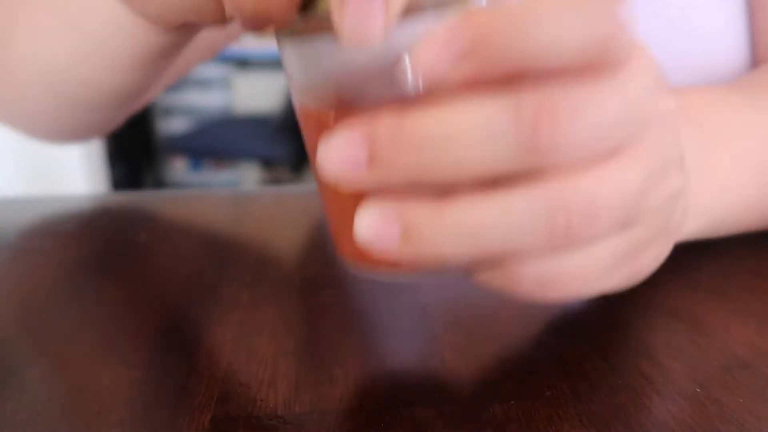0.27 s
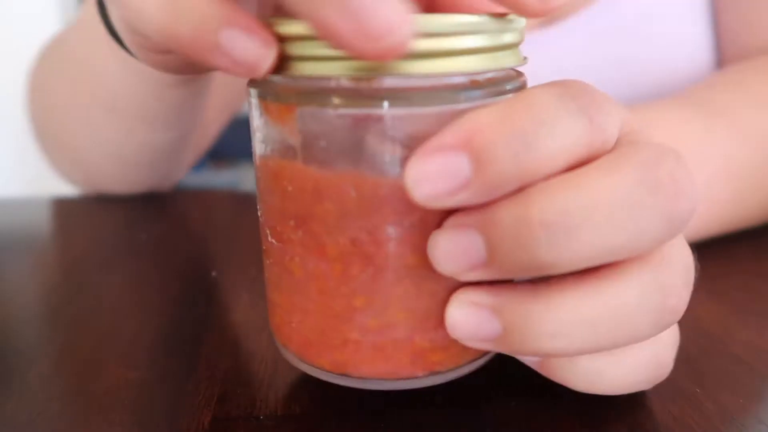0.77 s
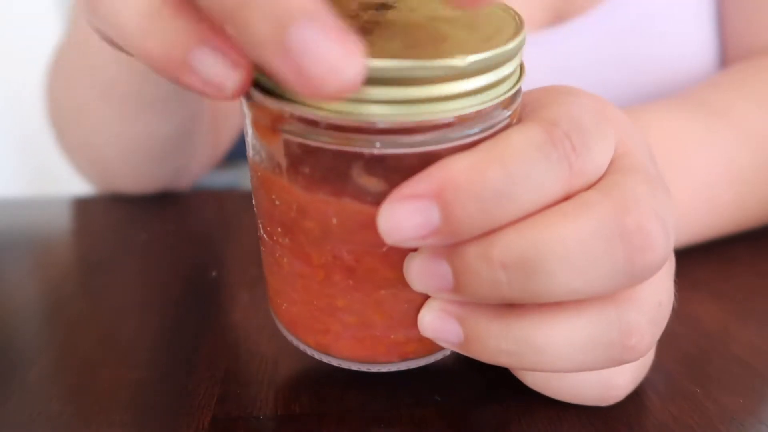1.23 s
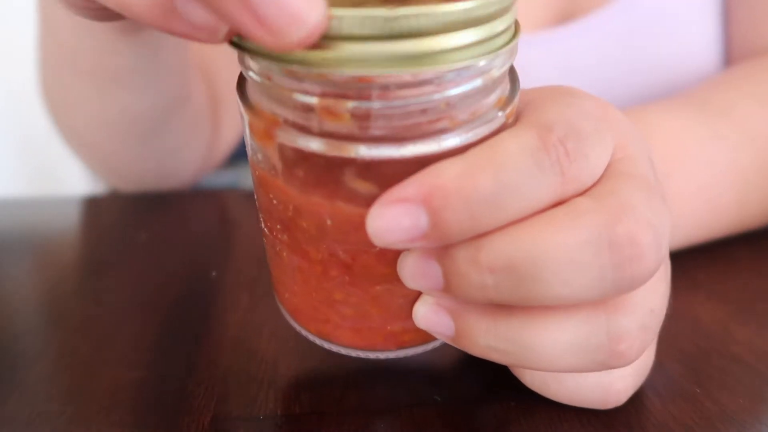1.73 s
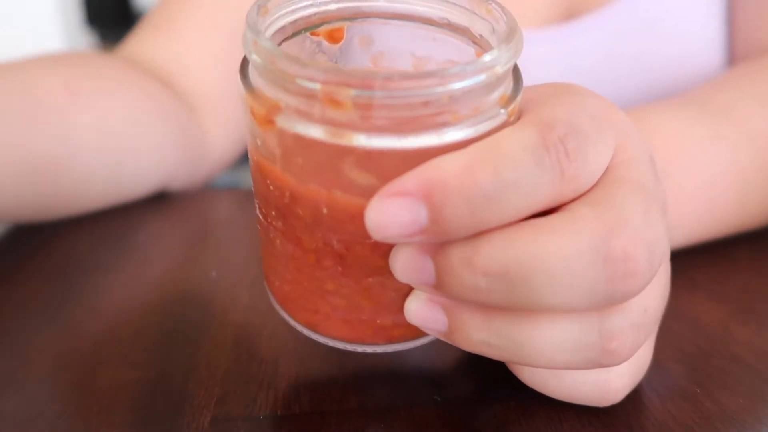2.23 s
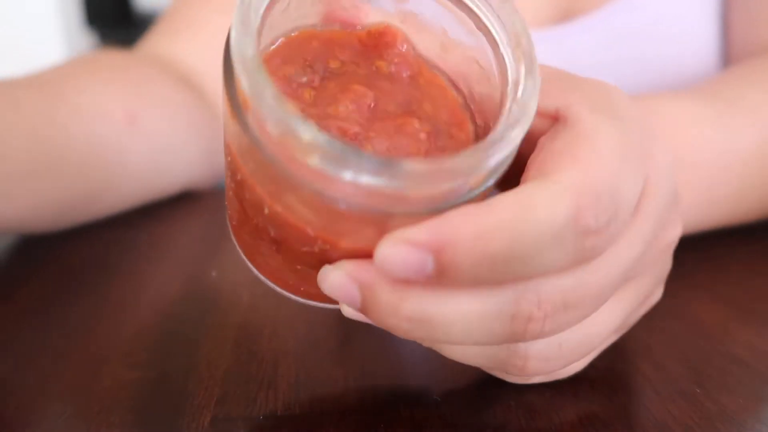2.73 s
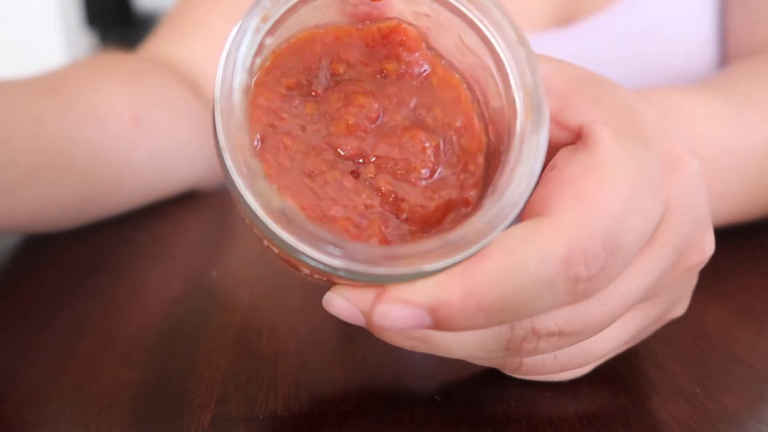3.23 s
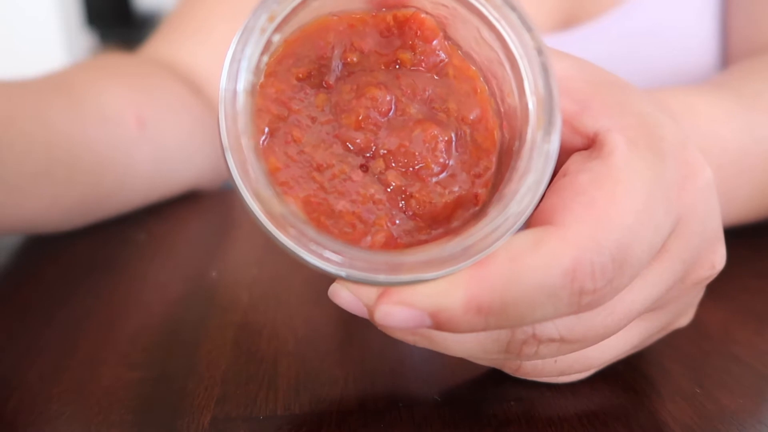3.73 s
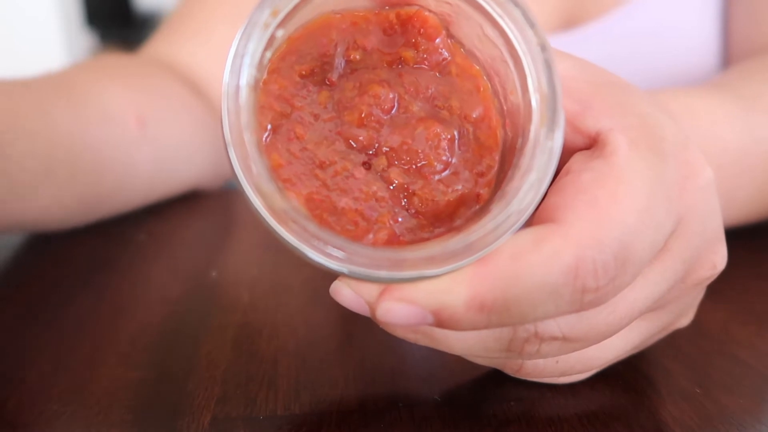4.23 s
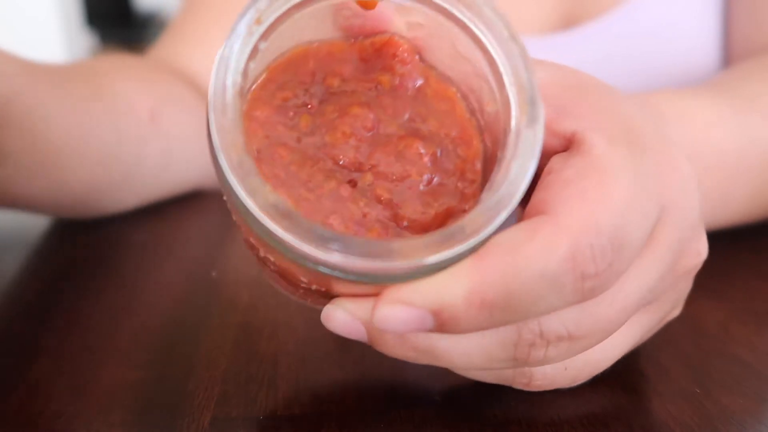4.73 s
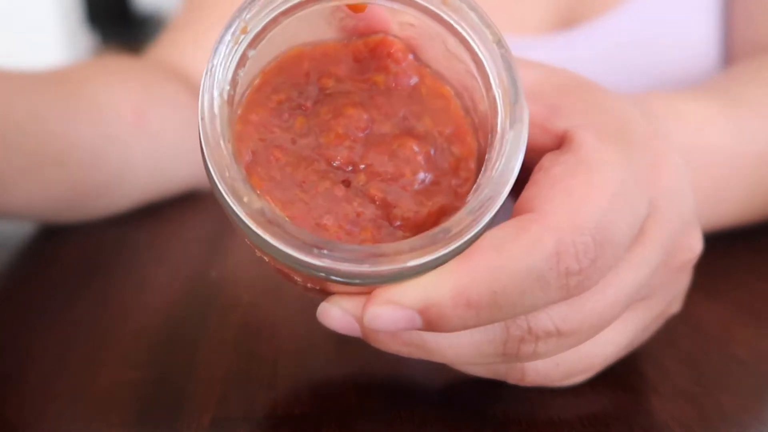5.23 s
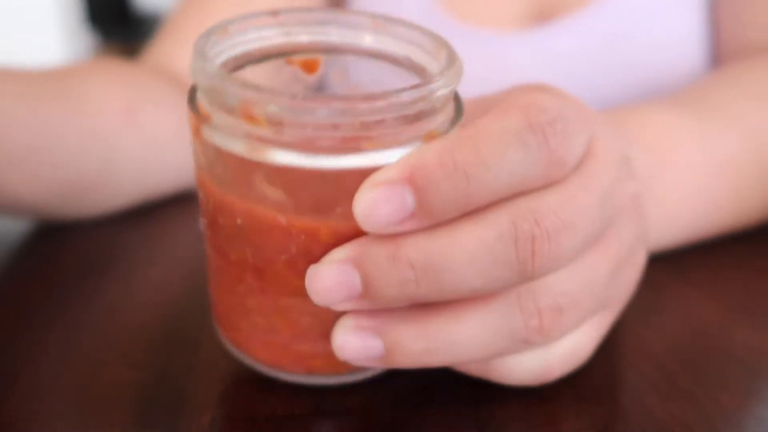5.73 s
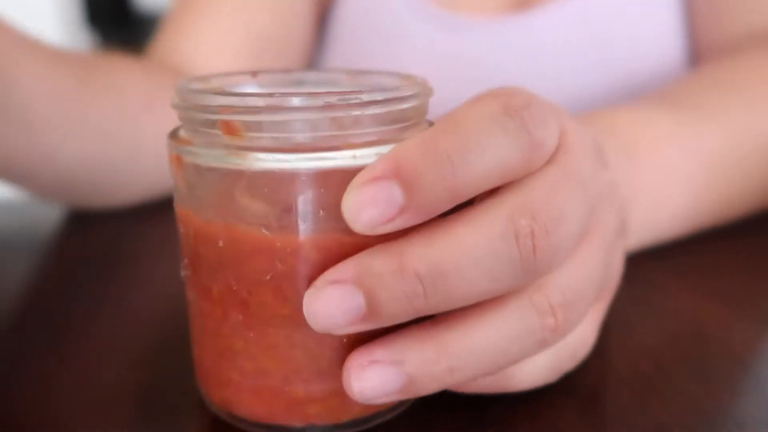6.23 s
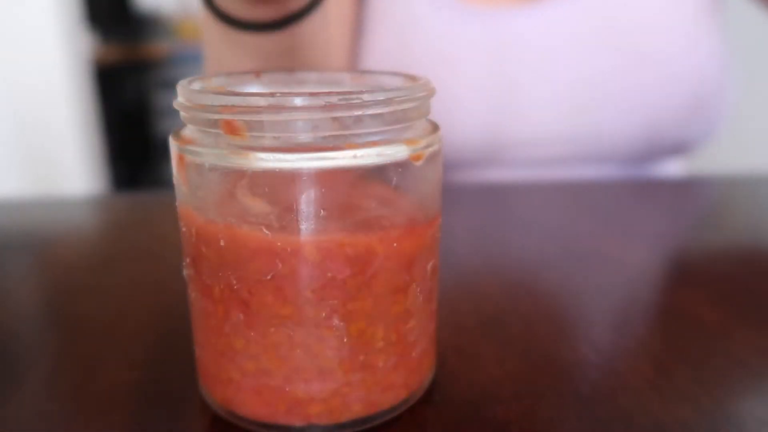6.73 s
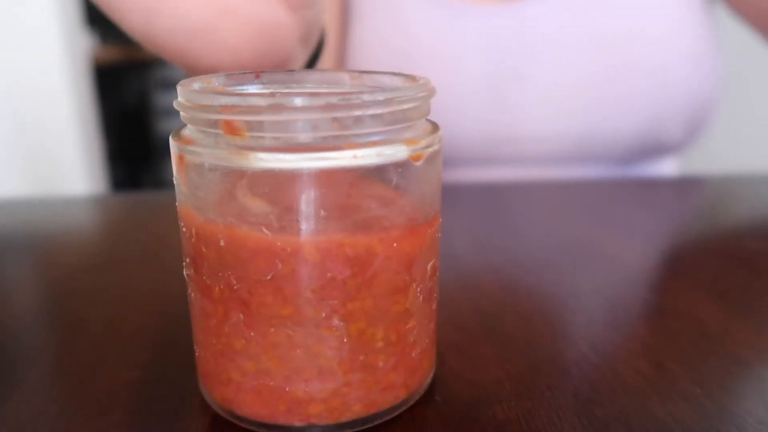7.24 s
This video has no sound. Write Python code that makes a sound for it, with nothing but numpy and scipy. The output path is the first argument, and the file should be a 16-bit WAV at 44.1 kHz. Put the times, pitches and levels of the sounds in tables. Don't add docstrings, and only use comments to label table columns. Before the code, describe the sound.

A quiet, softly rumbling room, heard close with short indoor echoes. From 0 to 0.5 s skin brushes glass with a faint squeak and tiny ticks. From 0.7 to 1.65 s a thin metal lid grates along a glass thread in four short groups of gritty twists, the strongest clicks snapping at about 1.25 s. At 1.73 s it clinks free with a brief bright ring. At 2.45 s it lands on a wooden table, ticks and rolls on its rim, falls flat with a sharp clack at 2.76 s, patters and slides until 3 s. From 3.45 s it scrapes, then rocks in quickening taps from 3.6 s, fading into tiny rattles by 4.4 s. A light brush follows, with small ticks at 5.0 and 5.6 s. The jar knocks edge first at 6.0 s and thumps heavily at 6.19 s; the background dips briefly, and sleeves rustle from 6.6 s to 7.5 s.

```python
import sys
import numpy as np
from scipy import signal
from scipy.fft import rfft, irfft, next_fast_len
from scipy.io import wavfile
from scipy.ndimage import uniform_filter1d, map_coordinates

SR = 44100
rng = np.random.default_rng(int(sys.argv[2]) if len(sys.argv) > 2 else 0)


def to_linear_factor(level_db):
    exponent = np.asarray(level_db, float) / 20
    return 10 ** exponent


def generate_wav(signal):
    frames = np.transpose(np.atleast_2d(signal))
    scaled = np.clip(frames, -1, 1) * 32767
    pcm = np.round(scaled).astype(np.int16)
    wavfile.write(sys.argv[1], SR, pcm)


N = 330750
SIZE = next_fast_len(N + SR // 2)
HZ = np.fft.rfftfreq(SIZE, 1 / SR)
SHORT = 2 ** 14

# (f/Hz, density/dB)
AIR_SPECTRUM = [(12, -28), (20, 5), (49, -8.5), (77, -7.5), (138, -7.5), (172, -13.5), (210, -8.5),
                (388, -17), (558, -16), (624, -23.5), (1090, -24.5), (1480, -28), (1760, -28), (11400, -46),
                (16000, -59)]
AIR_DB = -45.5
# (f/Hz, likeness/1)
NOISE_ALIKE = [(60, 1), (130, 1), (290, 0.841), (640, 0.6), (1410, 0.52), (3100, 0.25), (6820, -0.066),
               (15000, -0.67)]
# (f/Hz, t60/s)
ROOM_T60 = [(100, 0.18), (500, 0.52), (1400, 0.6), (3000, 0.469), (8000, 0.37)]
# (f/Hz, level/dB)
ECHO_SPECTRUM = [(50, 13.5), (350, -2.5), (900, -3), (1800, -4.5), (3000, -7.5), (5000, 0), (10000, 1)]
# (f/Hz, likeness/1)
ECHO_ALIKE = [(100, 1), (800, 0.99), (2500, 0.97), (6000, -0.77)]

# (start/s, end/s, first level/dB, last level/dB)
RUSTLE_STROKES = [
    [(.08, 0.19, -70.5, -58), (.25, 0.47, -67.5, -62), (.338, 0.33, -54, -55)],
    [(6.596, 6.6, -50, -69), (6.61, 7.03, -62, -62), (7.05, 7.19, -50, -53), (7.2, 7.25, -50, -44),
     (7.265, 7.33, -51.5, -62), (7.34, 7.5, -57, -55.5)],
]
# (f/Hz, density/dB)
SKIN_SPECTRUM = [(880, -51), (1500, -13.5), (3760, -10), (4350, -13.5), (4750, -16), (13700, -36.5),
                 (15500, -32)]
# (f/Hz, density/dB)
CLOTH_SPECTRUM = [(120, -44), (200, -21), (272, -10), (521, -14.5), (3350, -15), (7150, -30), (8570, -35),
                  (9210, -74), (15000, -81.5)]
# (start/s, end/s, first level/dB, last level/dB, f/Hz)
SQUEAKS = [
    (0, .09, -54, -66, 3455),
    (.32, .365, -62, -62, 4300),
    (3.51, 3.575, -59, -53, 3820),
    (3.49, 3.54, -53, -60, 3600),
]
# (start/s, end/s, first level/dB, last level/dB, f/Hz)
AFTERRINGS = [
    (1.743, 1.88, -48, -62, 3155),
    (1.748, 1.84, -51, -65, 5320),
]

# (t/s, peak/dB, bass/dB, treble/dB)
TOUCHES = [
    (6.0078, -8.5, -9.5, -20),
    (6.0203, -10.5, -21, -24),
    (6.033, -22.5, -4, -43),
    (6.048, -35, -16, -37),
    (7.046, -33, -3, -5),
]
# (t/s, peak/dB, bass/dB, treble/dB)
FOOT_BLOWS = [
    (6.186, -27.5, -15, -10),
    (6.1898, 2.5, -18.5, -4.5),
    (6.194, -18, -42, 3.5),
    (6.201, -8.5, -25, -26),
]
# (f/Hz, width/Hz, level/dB)
SOFT_TABLE_MODES = [(112, 59, -25), (226, 37, 5.5), (378, 240, 7), (780, 460, -10), (1450, 250, -1.5),
                    (2050, 410, -0.5), (2900, 180, 12)]
# (f/Hz, width/Hz, level/dB)
TABLE_MODES = [(108, 46, -14.5), (247, 25, 1), (347, 60, -1), (494, 410, 6.5), (950, 420, -8),
               (1235, 180, -3.5), (1570, 600, -7), (2040, 145, 3), (2250, 256, -8.5), (3170, 140, -2)]
# (f/Hz, density/dB)
TABLE_CRACK = [(20, -46), (60, -31.5), (300, 3), (1000, -22.5), (1900, -4), (3300, -19.5), (4500, -42),
               (9000, -65), (16000, -70.5)]

# (start/s, end/s, first level/dB, last level/dB, bass/dB)
TURNS = [
    [(0.691, 0.785, -35.5, -38, -7), (0.798, 0.846, -34.5, -30, -4), (0.855, 0.89, -32, -41, 0.5)],
    [(0.974, 1.03, -38, -40.5, 5.5), (1.035, 1.054, -34.5, -40.5, -1.5)],
    [(1.1, 1.15, -45, -46, 4), (1.158, 1.2, -28, -28, -13.5), (1.21, 1.247, -35, -34, -10),
     (1.31, 1.43, -64, -68, -20)],
    [(1.462, 1.5, -37.5, -36, 0), (1.51, 1.53, -34.5, -32, 1), (1.535, 1.59, -33, -38.5, 0),
     (1.606, 1.615, -51, -65, 0)],
]
TURN_TREBLE_DB = [-25, -31, -28, -29.5]
TURN_BROAD_DB = [-8.5, -17.5, -14, -13.5]
# (peak t/s, peak/dB, bass/dB, treble/dB)
SURGES = [
    [(0.826, -31, -1, 0)],
    [],
    [(1.192, -27, -8, -17), (1.287, -27, -1, -9)],
    [(1.655, -46, 6, -13)],
]
BIND_DB_PER_S, FREE_DB_PER_S, SURGE_DEPTH_DB = 298, 513, 41
WRIST_ATTACK_S = 0.014
ATTACK_S, RELEASE_S, EDGE_DB = 0.016, 0.039, 30
# (f/Hz, width/Hz, level/dB)
TIGHT_MODES = [(547, 304, -1), (973, 110, 2), (1195, 41, 6), (1570, 72, -3.5), (1910, 79, 2.5),
               (2290, 65, -0.5), (2960, 78, -22), (3340, 150, 0.5), (3700, 140, -7), (5050, 48, -27),
               (5250, 40, -27.5)]
# (f/Hz, width/Hz, level/dB)
EASING_MODES = [(287, 18, 0.5), (408, 58, -5.5), (945, 106, -1.5), (1250, 68, 2), (1890, 170, -0.5),
                (2280, 110, -1), (2540, 79, -7), (2930, 110, -18), (3240, 38, -29), (7290, 46, -37)]
# (f/Hz, width/Hz, level/dB)
BINDING_MODES = [(496, 120, -4.5), (1100, 180, 4), (1854, 76, 6), (2000, 140, 0.5), (2260, 84, 4),
                 (2495, 49, 2.5), (2800, 73, -19), (3218, 16, 7.5), (3560, 15, -15), (3770, 170, -22),
                 (5770, 80, -25), (7253, 28, -10)]
# (f/Hz, width/Hz, level/dB)
SLACK_MODES = [(644, 120, 6), (1020, 160, 1.5), (1240, 48, 3.5), (1860, 142, -9.5), (2240, 89, -8),
               (2580, 73, -4.5), (3020, 68, -13), (3480, 12, -15), (3590, 48, -23), (5870, 45, -38),
               (7340, 140, -19)]
# (t/s, peak/dB, bass/dB, treble/dB)
CATCHES = [(0.185, -46, -22, 1), (0.288, -42, -25, -7), (0.3391, -37, -35, -25), (0.4344, -39, -28, -13),
           (0.7915, -33, -24, -4), (0.824, -38, -18, -40), (0.8789, -22, -1.5, -44),
           (0.9734, -33.5, -1, -33), (1.0503, -39, -7, -39), (1.192, -17.5, -14.5, -39),
           (1.2515, -32, -27, -7), (1.2545, -5.5, -7, -13.5), (1.2575, -8, -5.5, -7.5),
           (1.2646, -10.5, -9, -43), (1.283, -5.5, -6, -17), (1.2924, -19, 6, -31), (1.479, -21, -15, -22),
           (1.5988, -17, -1, -16), (1.6403, -37, 13.5, -30), (1.6513, -27, -16, -35)]
# (f/Hz, width/Hz, level/dB)
JAR_MODES = [(566, 118, 2.5), (1210, 34, 8), (1770, 270, -6), (2210, 100, 1.5), (2500, 58, -5),
             (3260, 170, 0), (3470, 190, -5), (3540, 16, -7), (5160, 45, -39), (5430, 66, -19),
             (5830, 33, -15), (7350, 64, -16.5), (7354, 14, -20), (3210, 6.2, 2)]
# (f/Hz, density/dB)
JAR_CRACK = [(120, -42), (555, -22), (871, -3.5), (1210, -8.5), (1480, -29), (1790, -11), (2760, -2),
             (3160, 3), (4410, -20), (7470, -45), (9300, -26), (10900, -39), (12200, -30.5), (15000, -35.5),
             (16000, -90.5)]
# (t/s, peak/dB, bass/dB, treble/dB)
CLINKS = [
    (1.725, -5.5, -7.5, -10),
    (1.7469, -31, -1, -36),
]
# (f/Hz, width/Hz, level/dB)
LIFTED_MODES = [(1026, 15.7, 13), (1216, 15, 1), (1704, 94, 0.5), (3130, 11, 1.5), (3120, 64, -18),
                (3650, 23.5, -23), (3820, 30, -6), (4174, 59, -16), (5100, 130, -18), (5330, 53, -18),
                (5870, 50, -21), (7250, 70, -22), (9000, 100, -8)]
# (f/Hz, density/dB)
LIFTED_CRACK = [(180, -25), (300, -15.5), (800, -33), (1100, 6.5), (2520, -21.5), (3190, 0), (4440, -38),
                (7320, -15.5), (9390, -33), (16000, -58)]

# (t/s, peak/dB, bass/dB, treble/dB)
RIM_BLOWS = [(2.446, -13.5, -49.5, 1), (2.448, -24.5, -3, -12), (2.451, -13.5, -50, -24),
             (2.471, -20, -34.5, -18.5), (2.478, -29, -41, -26), (2.485, -22, -28, -29),
             (2.504, -26.5, -27, -45), (2.513, -28, -17, -21), (2.568, -41, -20, -20), (2.6, -30, -22, -11),
             (2.613, -38, -21, -15), (2.642, -38, -16, -27), (2.655, -36, -17.5, -23),
             (2.69, -35.5, -24, -19), (2.728, -36, -11, -30)]
# (start/s, end/s, first level/dB, last level/dB, bass/dB)
ROLLS = [
    (2.485, 2.617, -44.5, -40.5, -19),
    (2.639, 2.757, -34.5, -45, -13.5),
]
# (f/Hz, width/Hz, level/dB)
RIM_MODES = [(490, 96, -8.5), (1044, 15, -3.5), (1690, 62, -9), (2110, 70, 2.5), (2578, 71, 0.5),
             (3520, 90, -21), (3670, 86, -16.5), (4100, 120, -33), (4580, 81, -38.5), (5350, 40, -17),
             (6920, 20, -9.5), (7900, 150, -13), (8700, 48, -9.5), (10850, 30, -20.5)]
# (f/Hz, density/dB)
RIM_CRACK = [(88, -48.5), (150, -31.5), (431, -19), (514, -16), (716, -10.5), (1190, -12), (1500, -17.5),
             (2500, 1.5), (3040, -17.5), (6390, -18.5), (16000, -69.5)]
# (t/s, peak/dB, bass/dB, treble/dB)
FALL_BLOWS = [
    (2.761, -2.5, -25.5, -19),
    (2.777, -14, -31, -23),
    (2.791, -11, -15.5, -10.5),
    (2.824, -12, -44, -35.5),
    (2.83, -15.5, -28, -39),
    (2.834, -16, -20, -36),
    (2.844, -21, -10, -26),
    (5.018, -23, -25, -16),
]
# (f/Hz, width/Hz, level/dB)
FLAT_MODES = [(467, 130, -3), (950, 55, -35), (1183, 15, 4.5), (1606, 33, 1.5), (2220, 240, 2),
              (2610, 245, 3.5), (3150, 230, -1.5), (3595, 67, -1.5), (4100, 150, -10), (4850, 210, -5.5),
              (6850, 1800, -6), (6970, 25, -23), (8780, 60, -14), (10850, 23, 6)]
# (f/Hz, density/dB)
FLAT_CRACK = [(88, -72), (150, -37.5), (457, -2), (689, -38), (871, -5), (2310, 5.5), (3350, -35.5),
              (4160, -7.5), (7620, -46.5), (11900, -44), (16000, -93.5)]
# (start/s, end/s, first level/dB, last level/dB, bass/dB)
SLIDES = [
    (2.453, 2.74, -48, -53, -12),
    (2.76, 2.832, -36, -51, -1),
    (2.826, 3.01, -38, -55, -18),
    (3.423, 3.5, -59, -41.5, -10),
    (3.51, 3.6, -70, -49, -10),
    (3.608, 3.82, -43, -43.5, -4),
    (3.83, 4.26, -44, -59.5, -1.5),
    (4.462, 4.583, -51.5, -62.5, 1),
]
ROLL_TREBLE_DB, SLIDE_TREBLE_DB = -34, -33.5
# (t/s, peak/dB, bass/dB, treble/dB)
STRAY_ROCKS = [
    (3.488, -20.5, -30, -13),
    (5.602, -45.5, -12, -27),
]
ROCK_DB = [-12.5, -11, -13.5, -14.5, -19, -15.5, -18, -23, -32, -20.5]
ROCK_S, ROCK_GAP_S, ROCK_SHRINK = 3.601, .0538, .94
ROCK_BASS_DB, ROCK_TREBLE_DB, DULLING_DB_PER_DB = -17.5, -7, 0.44
# (f/Hz, width/Hz, level/dB)
ROCKING_MODES = [(483, 85, -12.5), (886, 60, -8.5), (1204, 37, -9), (1550, 24, -2.5), (2265, 290, -2),
                 (3250, 220, -21.5), (3540, 30, -5.5), (4140, 166, -7.5), (4630, 87, -13), (5420, 60, -16),
                 (6170, 320, -24), (6900, 34, -25), (7640, 60, -25)]
# (f/Hz, density/dB)
DRAG_SPECTRUM = [(88, -31), (150, -12), (450, -2), (730, -18), (1000, -2.5), (2100, -4.5), (3300, -9.5),
                 (4100, -19.5), (7870, -11), (12000, -41), (15600, -91)]
# (t/s, peak/dB)
TIPS = [(3.9118, -26), (4.0097, -25), (4.0496, -26.5), (4.0773, -30), (4.1132, -31), (4.138, -31),
        (4.1686, -32), (4.1932, -33.5), (4.2226, -35.5), (4.241, -40.5), (4.266, -47), (4.2828, -38),
        (4.3067, -39.5), (4.3255, -42.5), (4.3444, -45), (4.3597, -44)]
TIP_BASS_DB, TIP_TREBLE_DB = -10, -10.5
# (f/Hz, width/Hz, level/dB)
EDGE_MODES = [(368.6, 10, -2), (1240, 280, -6), (2200, 235, 10.5), (2500, 270, -0.5), (3580, 105, 1.5),
              (4120, 130, 3), (4800, 220, -8)]

# (f/Hz, phase/rad)
JAR_LEAD = [(8300, 0), (8800, 2.8), (13100, 2.8), (13600, 6.3)]
# (f/Hz, phase/rad)
LID_LEAD = [(0, 0), (3190, .7), (4220, 1.8), (6500, 2.1), (7000, 3.1), (14700, 3.3), (15400, 9.5)]
# (f/Hz, phase/rad)
TABLE_LEAD = [(2760, 0), (7600, .2), (9000, 2.3), (14000, 2.6)]
# (f/Hz, left-right/dB)
JAR_PAN = [(100, 0.2)]
# (f/Hz, left-right/dB)
LID_PAN = [(550, 2.5), (1650, 2), (15000, 5.5)]

REST_DB, DUCK_DB = 0, -4
DUCK_S, CLAMP_S, HOLD_S, RECOVER_S = 6.19, 0.14, 0.18, 0.45
# (start/s, end/s, f/Hz)
CEILINGS = [ (1.745, 1.82, 9800), (2.455, 2.62, 7500), (2.62, 2.75, 7500), (2.805, 2.89, 7000),
            (2.89, 2.94, 8200), (3.59, 3.68, 8600), (3.9, 4.08, 8600), (7.04, 7.27, 7800),
            (1.83, 2.43, 12500), (2.94, 3, 10300), (3, 3.47, 12500), (3.68, 3.82, 11000),
            (4.08, 4.24, 11500), (4.24, 5, 12600), (5.05, 6.18, 12500), (6.2, 6.99, 12300),
            (6.99, 7.04, 10000), (7.27, 7.38, 9000), (7.38, 7.44, 10200)]
OPEN_HZ, RAGGED_HZ = 16400, 350
SPARED_DB, SPARED_SHARE = 5.5, .65


def unit(x):
    return x / np.sqrt(np.mean(x ** 2) + 1e-20)


def along(points, hz=HZ):
    f, v = np.transpose(points)
    return np.interp(np.log(hz + 1), np.log(f + 1), v)


def curves(rows):
    s, level, *cols = np.transpose(rows)
    t = np.arange(N) / SR
    return [np.interp(t, s, level, -120, -120)] + [np.interp(t, s, c) for c in cols]


def wobble(rate_hz):
    knots = rng.standard_normal(int(N * rate_hz / SR) + 4)
    return map_coordinates(knots, [np.arange(N) * rate_hz / SR])


def filtered(x, response):
    return irfft(rfft(x, SIZE) * response, SIZE)[..., :N]


def rush(spectrum, alike):
    turn = np.arccos(np.clip(along(alike), -1, 1)) / 2
    response = to_linear_factor(along(spectrum)) * [np.cos(turn), np.sin(turn)]
    mid, side = filtered(rng.standard_normal((2, N)), response)
    return np.array([mid + side, mid - side]) / np.sqrt(np.mean(mid ** 2))


def rub(start, end, first_db, last_db, *tone, attack_s=ATTACK_S, release_s=RELEASE_S):
    return [(start - attack_s, first_db - EDGE_DB, *tone),
            (start, first_db, *tone),
            (end, last_db, *tone),
            (end + release_s, last_db - EDGE_DB, *tone)]


def body(modes, broad, broad_db, low_hz, high_hz, top_hz):
    hz = np.fft.rfftfreq(SHORT, 1 / SR)

    def under(edge_hz):
        return 1 / (1 + 1j * np.sqrt(2) * hz / edge_hz - (hz / edge_hz) ** 2)

    def over(edge_hz):
        return -(hz / edge_hz) ** 2 * under(edge_hz)

    cepstrum = irfft(np.log(to_linear_factor(along(broad, hz) + broad_db) + 1e-6), SHORT)
    cepstrum[1:SHORT // 2] *= 2
    cepstrum[SHORT // 2 + 1:] = 0
    crack = np.exp(rfft(cepstrum))
    rings = sum((-1) ** k * to_linear_factor(db) * 1j * hz * w / (c * c - hz ** 2 + 1j * hz * w)
                for k, (c, w, db) in enumerate(modes))
    whole = rings * under(top_hz) ** 2 + crack
    ranges = [over(low_hz) * under(high_hz), under(low_hz) ** 2, over(high_hz) ** 2]
    return irfft(whole * ranges, SHORT)


def rung(force, parts):
    busy = np.flatnonzero(np.abs(force[0]) > 1e-5)
    first, last = busy[0], busy[-1]
    out = np.zeros(N + SHORT)
    out[first:last + SHORT] = signal.oaconvolve(force[:, first:last + 1], parts, axes=1).sum(0)
    return out[:N]


def struck(events, parts, chatter_db, lead_s, chatter_s, count):
    force = np.zeros((3, N))
    for (s, db, bass_db, treble_db), luck in zip(events, rng.random((len(events), 4, count))):
        late = (lead_s + chatter_s) * luck[0] - lead_s
        fade_db = np.where(late < 0, 14 * late / lead_s, -14 * late / chatter_s)
        chatter = to_linear_factor(chatter_db + fade_db) * np.cos(2 * np.pi * luck[1:])
        size = np.c_[np.ones(3), chatter]
        at = np.round((s + np.append(0, late)) * SR).astype(int)
        force[:, at] += to_linear_factor(db + np.array([[0], [bass_db], [treble_db]])) * size
    return rung(force, parts / np.abs(parts).max(axis=1, keepdims=True))


def grit(per_second, judder_db, judder_hz, patchy_db):
    slips = (rng.random(N) < per_second / SR) * rng.standard_normal(N)
    slips = slips * to_linear_factor(judder_db * wobble(judder_hz))
    z = signal.stft(slips, nperseg=256)[2]
    field = uniform_filter1d(rng.standard_normal(z.shape), size=3, axis=0)
    field = uniform_filter1d(field, size=8, axis=1)
    return unit(signal.istft(z * to_linear_factor(patchy_db * unit(field)), nperseg=256)[1][:N])


def rubbed(strokes, parts, slips):
    force = np.zeros((3, N))
    for rows in strokes:
        db, bass_db, treble_db = curves(rows)
        on = db > db.min()
        force[:, on] += to_linear_factor(db[on] + np.array([0 * db[on], bass_db[on], treble_db[on]]))
    return rung(force * slips, parts / np.linalg.norm(parts, axis=1, keepdims=True))


def placed(x, lead, pan):
    half = np.exp(.5j * np.interp(HZ, *np.transpose(lead))) * to_linear_factor(along(pan) / 2)
    return filtered(x, np.array([half, 1 / half]))


def room_tone():
    return to_linear_factor(AIR_DB + 0.37 * wobble(4.6)) * rush(AIR_SPECTRUM, NOISE_ALIKE)


def room(x):
    out, step = np.zeros((2, N + SR)), SR // 5
    noise = np.tile(rush(ECHO_SPECTRUM, ECHO_ALIKE), 2)
    for start in range(0, N, step):
        hz, t, z = signal.stft(noise[:, start:start + SR // 2], SR, nperseg=256)
        decay = to_linear_factor(-60 * t / along(ROOM_T60, hz)[:, None])
        tail = signal.istft(z * decay, SR, nperseg=256)[1]
        tail = tail / np.linalg.norm(tail[0])
        wet = signal.fftconvolve(x[None, start:start + step], tail, axes=1)
        out[:, start + 300:start + 300 + wet.shape[1]] += wet
    return out[:, :N]


def rustle():
    skin, sleeve = (sum(to_linear_factor(curves(rub(*row))[0]) for row in rows) for rows in RUSTLE_STROKES)
    grain = to_linear_factor(3.0 + 1.6 * wobble(70) + 0.79 * wobble(400))
    return grain * (skin * rush(SKIN_SPECTRUM, NOISE_ALIKE) + sleeve * rush(CLOTH_SPECTRUM, NOISE_ALIKE))


def squeaks():
    t, drift = np.arange(N) / SR, 2.0 * wobble(90)
    return sum(to_linear_factor(curves(rub(*row))[0]) * np.sin(2 * np.pi * hz * t + drift)
               for *row, hz in SQUEAKS + AFTERRINGS)


def set_down():
    soft = body(SOFT_TABLE_MODES, TABLE_CRACK, broad_db=-11, low_hz=157, high_hz=1000, top_hz=1730)
    hard = body(TABLE_MODES, TABLE_CRACK, broad_db=3.0, low_hz=137.0, high_hz=1370, top_hz=3560)
    touch = struck(TOUCHES, soft, chatter_db=-8, lead_s=0.00025, chatter_s=0.0124, count=3)
    thump = struck(FOOT_BLOWS, hard, chatter_db=-15, lead_s=.0002, chatter_s=.004, count=4)
    return thump - touch


def surge(s, db, *tone):
    low_db = db - SURGE_DEPTH_DB
    return [(s - SURGE_DEPTH_DB / BIND_DB_PER_S, low_db, *tone),
            (s, db, *tone),
            (s + SURGE_DEPTH_DB / FREE_DB_PER_S, low_db, *tone)]


def scrape():
    slips = grit(per_second=11000, judder_db=1.8, judder_hz=200, patchy_db=3.2)
    grips = (TIGHT_MODES, EASING_MODES, BINDING_MODES, SLACK_MODES)
    out = 0
    for modes, turns, surges, broad_db, treble_db in zip(grips, TURNS, SURGES, TURN_BROAD_DB, TURN_TREBLE_DB):
        strokes = [rub(*row, treble_db, attack_s=WRIST_ATTACK_S, release_s=0.0048) for row in turns]
        strokes += [surge(*row) for row in surges]
        lid = body(modes, JAR_CRACK, broad_db, low_hz=790, high_hz=4270, top_hz=9850)
        out = out + rubbed(strokes, lid, slips)
    return out


def twisting():
    held = body(JAR_MODES, JAR_CRACK, broad_db=-8.0, low_hz=850, high_hz=5200, top_hz=9500)
    lifted = body(LIFTED_MODES, LIFTED_CRACK, broad_db=1.5, low_hz=1520, high_hz=4800, top_hz=17100)
    catches = struck(CATCHES, held, chatter_db=-11, lead_s=.0005, chatter_s=.006, count=5)
    clink = struck(CLINKS, lifted, chatter_db=5.5, lead_s=.0003, chatter_s=0.0045, count=4)
    return scrape() + catches + clink


def quickening(first_s, gap_s, shrink, k):
    return first_s + gap_s * (1 - shrink ** k) / (1 - shrink)


def rocks():
    return [(quickening(ROCK_S, ROCK_GAP_S, ROCK_SHRINK, k), db, ROCK_BASS_DB,
             ROCK_TREBLE_DB + DULLING_DB_PER_DB * (db - max(ROCK_DB)))
            for k, db in enumerate(ROCK_DB)]


def loose_lid():
    upright = body(RIM_MODES, RIM_CRACK, broad_db=-4.5, low_hz=840, high_hz=4920, top_hz=10600)
    lying = body(FLAT_MODES, FLAT_CRACK, broad_db=-6.5, low_hz=815, high_hz=4900, top_hz=11000)
    tilted = body(ROCKING_MODES, DRAG_SPECTRUM, broad_db=-15, low_hz=800, high_hz=5300, top_hz=11300)
    sliding = body(ROCKING_MODES, DRAG_SPECTRUM, broad_db=19.5, low_hz=825, high_hz=4800, top_hz=9000)
    tipping = body(EDGE_MODES, FLAT_CRACK, broad_db=-40.5, low_hz=800, high_hz=4700, top_hz=7000)
    slips = grit(per_second=6000, judder_db=0.1, judder_hz=130, patchy_db=3)

    landing = struck(RIM_BLOWS, upright, chatter_db=2.5, lead_s=0.00067, chatter_s=0.011, count=6)
    roll = rubbed([rub(*row, ROLL_TREBLE_DB) for row in ROLLS], upright, slips)
    fall = struck(FALL_BLOWS, lying, chatter_db=-4.0, lead_s=0.0015, chatter_s=.012, count=8)
    slide = rubbed([rub(*row, SLIDE_TREBLE_DB) for row in SLIDES], sliding, slips)
    blows = STRAY_ROCKS[:1] + rocks() + STRAY_ROCKS[1:]
    rocking = struck(blows, tilted, chatter_db=4.5, lead_s=0.0066, chatter_s=.012, count=20)
    tips = [(*row, TIP_BASS_DB, TIP_TREBLE_DB) for row in TIPS]
    swings = struck(tips, tipping, chatter_db=2, lead_s=0.00097, chatter_s=0.008, count=8)
    return landing + roll + fall + slide + to_linear_factor(-5.5) * rocking + to_linear_factor(-1.5) * swings


def scene():
    jar, lid, thump = twisting(), loose_lid(), set_down()
    near = placed(jar, JAR_LEAD, JAR_PAN) + placed(lid, LID_LEAD, LID_PAN)
    near = near + placed(thump, TABLE_LEAD, [(100, 1.0)])
    echoes = room(to_linear_factor(-15.5) * jar + to_linear_factor(-5.0) * lid + to_linear_factor(-6.0) * thump)
    return near + echoes + rustle() + room_tone() + squeaks()


def gain_control(x):
    turns = DUCK_S + np.cumsum([0, CLAMP_S, HOLD_S, RECOVER_S])
    return x * to_linear_factor(np.interp(np.arange(N) / SR, turns, [REST_DB, DUCK_DB, DUCK_DB, REST_DB]))


def thin_treble(x):
    hz, t, z = signal.stft(x, SR, nperseg=1024)
    top = np.full(len(t), OPEN_HZ)
    for start, end, edge_hz in CEILINGS:
        top[(t > start) & (t < end)] = edge_hz
    top = top + RAGGED_HZ * np.repeat(rng.standard_normal(len(t)), repeats=3)[:len(t)]
    lasting = uniform_filter1d(np.abs(z).sum(0), size=5, axis=1)
    around = uniform_filter1d(lasting, size=25, axis=0)
    strong = 1. * (lasting > to_linear_factor(SPARED_DB) * around)
    line = uniform_filter1d(strong, size=3, axis=0) > 0
    luck = np.kron(rng.random((len(hz) // 16 + 1, len(t) // 4 + 1)), np.ones((16, 4)))
    line &= luck[:len(hz), :len(t)] < SPARED_SHARE
    return signal.istft(z * ((hz[:, None] < top) | line), SR, nperseg=1024)[1][:, :N]


def top_cut(x):
    return signal.sosfilt(signal.butter(12, 16430, fs=SR, output="sos"), x)


def record(dry):
    x = gain_control(dry)
    x = x / (1 + np.abs(x) ** 6) ** (1 / 6)
    x = thin_treble(x)
    return top_cut(x)


dry = scene()
out = record(dry)
generate_wav(out)
```